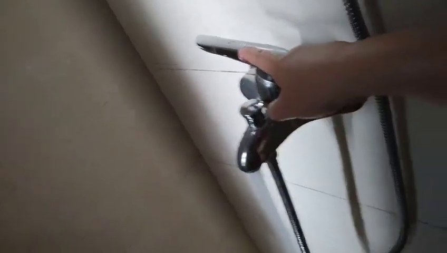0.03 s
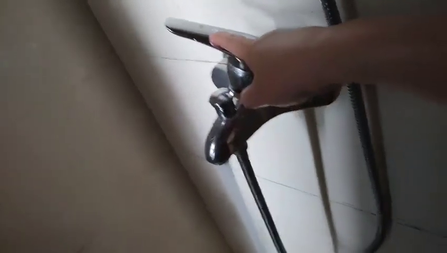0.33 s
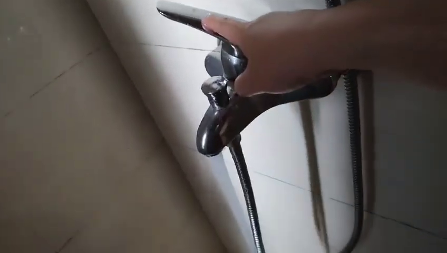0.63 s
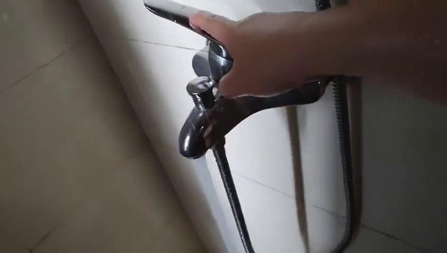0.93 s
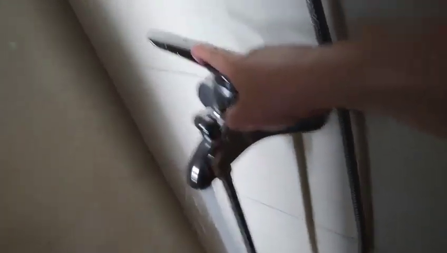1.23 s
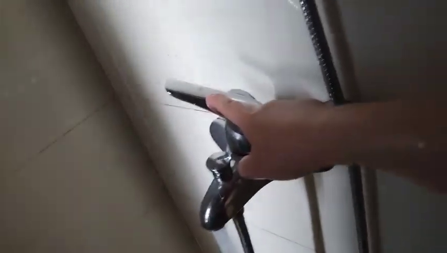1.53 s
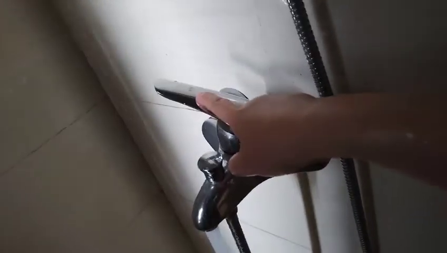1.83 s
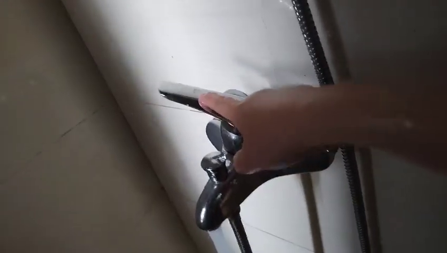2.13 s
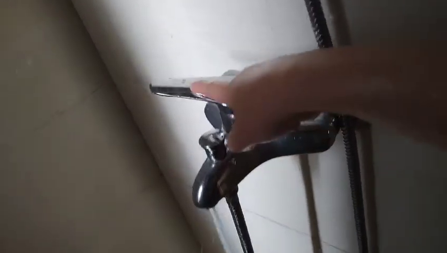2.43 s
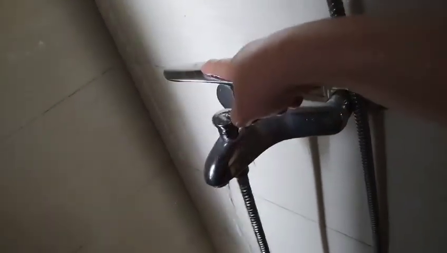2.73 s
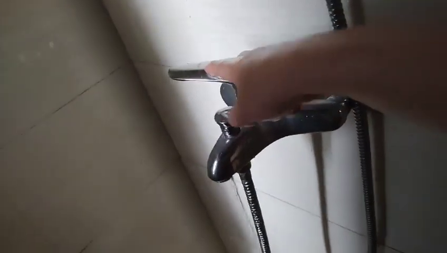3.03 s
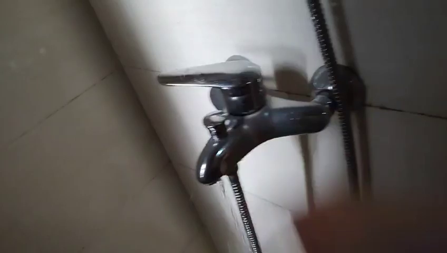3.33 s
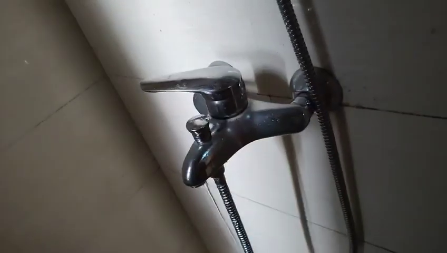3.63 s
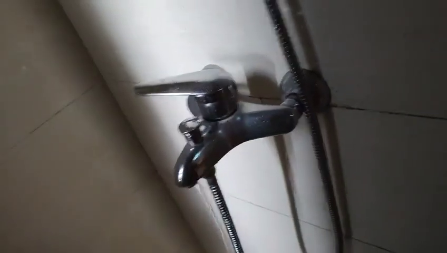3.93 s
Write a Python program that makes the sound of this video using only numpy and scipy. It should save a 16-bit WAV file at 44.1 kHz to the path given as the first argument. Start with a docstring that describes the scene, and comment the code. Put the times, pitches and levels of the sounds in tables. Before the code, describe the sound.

A stream of tap water splatters unevenly on wet tiles with a fine hiss and short bathroom echo. After a dull bump from the lever, it cuts off, leaving faint drips and two late splashes. One microphone hears it.

```python
"""Water from a bath tap falls on the floor of a small tiled bathroom: lumpy patter, hard slaps, pinging
bubbles and a fine spray. The tiles ring briefly, over a faint room noise. At 2.3 s the lever is pushed
shut with a dull bump, and at 2.9 s the stream stops. Tiny drips follow, and among them two late
splashes, near 3.4 s and 3.7 s. One microphone hears it all."""
import sys
import numpy as np
from scipy import signal
from scipy.fft import rfft, irfft
from scipy.io import wavfile

SR = 44100
rng = np.random.default_rng(int(sys.argv[2]) if len(sys.argv) > 2 else 0)


def int16_out(signal):
    """Quantize to a 16-bit WAV file."""
    q = np.round(np.clip(np.atleast_2d(signal).T, -1, 1) * 32767)
    wavfile.write(sys.argv[1], SR, q.astype(np.int16))


N = 176400
SHUT_S, PATTER_FALL_DB_PER_S = 2.916, 902


def amp(db):
    """Amplitude grows tenfold for every 20 dB."""
    return 10 ** (np.asarray(db) / 20)


def unit_rms(x):
    """Normalisation to a mean power of one."""
    return x / np.sqrt(np.mean(x ** 2) + 1e-20)


def unit_energy(x):
    """Normalisation to a total energy of one."""
    return x / (np.linalg.norm(x) + 1e-12)


def at_hz(points, hz):
    """Interpolation on a logarithmic frequency axis."""
    known_hz, values = np.transpose(points)
    return np.interp(np.log(hz + 1), np.log(known_hz + 1), values)


def add(mix, start_s, sound):
    """Superposition: a sound adds to the mix from its start time."""
    part = mix[max(round(start_s * SR), 0):][:len(sound)]
    part += sound[:len(part)]


def stream_level(curve, fall_db_per_s=PATTER_FALL_DB_PER_S):
    """Amplitude envelope: the stream follows a curve, then decays exponentially once the tap is shut."""
    t = np.arange(N) / SR
    db = np.interp(t + 0.01, *np.transpose(curve))  # 10 ms ahead, as the room takes that long to fill
    return amp(db - fall_db_per_s * np.maximum(t - SHUT_S, 0))


def drops(per_s, spread_db):
    """Shot noise: independent impacts at random times, many small and a few large."""
    hits = rng.random(N) < per_s / SR
    size = np.minimum(rng.exponential(1, N), 4)
    sign = rng.choice([-1, 1], N)
    return unit_rms(hits * sign * amp(spread_db * size))


def bursts(rows, flatten_s=0.00035, droplets_per_s=2500, size=4096):
    """Break-up on impact: each lump flattens and throws droplets whose strength decays exponentially."""
    out, t = np.zeros(N), np.arange(size) / SR
    for start_s, db, scatter_s in rows:
        droplets = rng.standard_normal(size) * (rng.random(size) < droplets_per_s / SR)
        envelope = np.minimum(t / flatten_s, 1) ** 2 * np.exp(-t / scatter_s)
        add(out, start_s, amp(db) * unit_energy(droplets * envelope))
    return out


# Decay of the tiled room. Each row: frequency in Hz, time to fall 60 dB in seconds.
REVERB_TIMES = [(200, 0.66), (1500, 0.24), (4000, 0.23), (7000, 0.17), (11000, 0.31)]
def bathroom(x, size=22050, echo_count=12, echo_span_s=0.018, echo_db=2.5, tail_db=2):
    """Reverberation: direct sound, early reflections off the near tiles and a short diffuse tail."""
    reflections = rng.standard_normal(size) * (rng.random(size) < 1 / 12)
    hz, t, spectrum = signal.stft(reflections, SR, nperseg=256)
    decay = amp(-60 * t / at_hz(REVERB_TIMES, hz)[:, None])
    build_up = 1 - np.exp(-t / 0.006)
    tail = signal.istft(spectrum * decay * build_up, SR)[1][:size]
    echoes = np.zeros(size)
    places = (np.arange(echo_count) + rng.random(echo_count)) / echo_count
    for place, sign in zip(places, rng.choice([-1, 1], echo_count)):
        add(echoes, 0.001005 + place * echo_span_s, np.array([sign * np.exp(-place / 2)]))
    response = amp(tail_db) * unit_energy(tail) + amp(echo_db) * unit_energy(echoes)
    response[0] += 1  # direct sound
    return signal.oaconvolve(x, unit_energy(response))[:N]


def landing(clicks, colour, spots, size=2048):
    """Convolution: each impact takes the echoes of its spot and a minimum-phase ring of given colour."""
    spot = rng.integers(0, spots, N)
    echoed = sum(bathroom(clicks * (spot == k)) for k in range(spots))
    log_gain = np.log(amp(at_hz(colour, abs(np.fft.fftfreq(size, 1 / SR)))))
    ring = np.fft.ifft(np.exp(np.conj(signal.hilbert(log_gain)))).real[:size // 2]
    return signal.oaconvolve(echoed, unit_energy(ring))[:N]


# Spectrum of the room's air. Each row: frequency in Hz, relative level in dB.
AIR_SPECTRUM = [(20, -54), (45, -38), (80, -27), (115, -10), (180, -8.5), (340, -1), (600, -7.5),
                (750, -3.5), (1050, -7), (1340, -11), (2600, -25), (3400, -42), (6000, -65)]
def room_noise():
    """Stationary filtered noise: the faint murmur of air in the room."""
    gain = amp(at_hz(AIR_SPECTRUM, np.fft.rfftfreq(N, 1 / SR)))
    return amp(-69) * unit_rms(irfft(rfft(rng.standard_normal(N)) * gain, N))


# Force of the falling stream. Each row: time in seconds, relative level in dB.
STREAM_CURVE = [(0.0, -32), (0.14, -33), (0.24, -34), (0.27, -34), (0.35, -33.5), (0.4, -32.5),
                (0.5, -35.5), (0.585, -39), (0.6, -28.5), (0.72, -36), (0.76, -32), (0.86, -32),
                (0.92, -35.5), (1.0, -36.5), (1.03, -32), (1.14, -33.5), (1.17, -37), (1.19, -38),
                (1.29, -30), (1.33, -37), (1.41, -39.5), (1.52, -32), (1.57, -36.5), (1.6, -30.5),
                (1.7, -33.5), (1.74, -32.5), (1.88, -36.5), (1.92, -33), (2.02, -35.5), (2.12, -34.5),
                (2.155, -33.5), (2.19, -32.5), (2.26, -32), (2.3, -35), (2.42, -32.5), (2.67, -33.5),
                (2.75, -30), (2.77, -38.5), (2.81, -28), (2.87, -39), (2.91, -35)]
# Lumps slapping down. Each row: start in seconds, relative level in dB, bubble pitch in Hz.
HARD_SLAPS = [(.001, -0.5, 3670), (0.012, -7, 4300), (.031, -6, 4440), (.042, -7.5, 3960),
              (.109, -2.5, 4070), (0.169, -5.5, 3930), (.252, -4, 3900), (.312, -14, 4160),
              (0.37, -8, 4100), (.547, -8.5, 3410), (0.596, -13, 3400), (.645, -7, 3960), (0.671, -7, 4500),
              (.811, -4.5, 3530), (.844, -2, 3870), (0.857, -5.5, 4560), (0.972, -5, 3960),
              (1.013, -8.5, 3880), (1.101, -16, 3430), (1.187, -4, 3680), (1.228, -4.5, 3830),
              (1.253, -9, 3380), (1.351, -6, 3770), (1.368, -8, 4400), (1.45, -5.5, 3570),
              (1.504, -5, 4280), (1.582, -15, 4050), (1.61, -6, 3880), (1.638, -11, 4300),
              (1.667, -1, 4390), (1.7, -3.5, 3200), (1.827, -4.5, 4430), (1.932, -7.5, 3950),
              (1.997, -7.5, 3140), (2.051, -8, 3080), (2.1, -5, 4410), (2.178, -4.5, 4440),
              (2.214, -3.5, 3040), (2.358, -13, 3600), (2.415, -7, 3320), (2.52, -2.5, 4510),
              (2.647, -15, 3410), (2.672, -7, 4500), (2.736, -10, 3960), (2.795, -8, 4410),
              (2.885, -4.5, 3350), (2.9, -20, 3720)]
# Spectrum of an impact. Each row: frequency in Hz, relative level in dB.
PATTER_SPECTRUM = [(60, -55), (105, -37.5), (140, -26.5), (200, -29.5), (400, -29), (800, -22), (1400, -20),
                   (2100, -17.5), (2550, -10.5), (3100, -1), (3550, 0.5), (3900, 1), (4500, 1.5),
                   (4900, -5), (5400, -8.5), (7000, -17), (12000, -38)]
def patter():
    """Impact noise: the stream breaks into drops and lumps that smack the wet floor."""
    rain = amp(-4) * stream_level(STREAM_CURVE) * drops(per_s=900, spread_db=3)
    slaps = bursts([(s, db - 3, 0.0021) for s, db, _ in HARD_SLAPS])
    return landing(rain + slaps, PATTER_SPECTRUM, spots=4)


# Strength of the deeper slapping. Each row: time in seconds, relative level in dB.
HOLLOW_CURVE = [(0.0, -44), (0.24, -49.5), (0.5, -49.5), (0.62, -47), (1.1, -47), (1.18, -55),
                (1.29, -44.5), (1.42, -51), (1.56, -52), (1.7, -46), (1.76, -52), (1.95, -47), (2.14, -48),
                (2.24, -41.5), (2.3, -45), (2.6, -48.5), (2.93, -51)]
# Single hollow slaps. Each row: start in seconds, relative level in dB, bubble pitch in Hz.
HOLLOW_SLAPS = [(0.254, -10.5, 2310), (1.604, -15.5, 2100), (1.668, -10, 2160), (2.167, -8.5, 2110),
                (2.214, -17, 2230), (2.527, -14, 2200)]
# Spectrum of a large lump. Each row: frequency in Hz, relative level in dB.
HOLLOW_SPECTRUM = [(200, -41.5), (700, -17), (1400, -11), (1800, -2.5), (2150, 5.5), (2600, 1), (3200, 6),
                   (4200, -35.5), (8000, -30)]
def hollow_patter():
    """Pitch falls with size: fewer, larger lumps land with a deeper note."""
    rain = amp(2) * stream_level(HOLLOW_CURVE) * drops(per_s=260, spread_db=4)
    slaps = bursts([(s, db - 4.5, 0.0055) for s, db, _ in HOLLOW_SLAPS])
    return landing(rain + slaps, HOLLOW_SPECTRUM, spots=3)


def ping(hz, t60_s, rise_per_s=1.4):
    """Damped oscillation: a trapped bubble rings, its pitch climbing as it nears the surface."""
    t = np.arange(3000) / SR
    tone = np.sin(2 * np.pi * hz * t * (1 + rise_per_s * t / 2))
    attack = 1 - np.exp(-hz * t)
    return unit_energy(tone * attack * amp(-60 * t / t60_s))


def bubbles(low_hz=2950, high_hz=4850, sizes=30):
    """Bubble resonance: air trapped by the drops pings at a pitch set by its size."""
    out = np.zeros(N)
    clicks = amp(-6.5) * stream_level(STREAM_CURVE) * drops(per_s=150, spread_db=1.5)
    size = rng.integers(0, sizes, N)
    for k, hz in enumerate(np.geomspace(low_hz, high_hz, sizes)):
        ring = ping(hz, t60_s=0.046)
        for at in np.flatnonzero(clicks * (size == k)):
            add(out, at / SR, clicks[at] * ring)
    return bathroom(out)


# Resonances where the stream lands. Each row: frequency in Hz, bandwidth in Hz, added gain as a ratio.
LANDING_MODES = [(2170, 24, 0.15), (2336, 22, 0.51), (2767, 41, 0.78), (3170, 46, 0.48), (3410, 19, 0.92),
                 (3816, 35, 0.69), (3960, 25, 0.91), (4430, 25, 0.94), (4600, 34, 0.21), (4970, 24, 0.26)]
def ringing(x):
    """Resonance: the place where the water lands favours a few narrow notes."""
    return x + sum(boost * signal.lfilter(*signal.iirpeak(hz, hz / width, fs=SR), x)
                   for hz, width, boost in LANDING_MODES)


def plinks(slaps, gain_db):
    """Air entrainment: each big lump traps a bubble that rings at its own pitch, from its own spot."""
    out = np.zeros(N)
    for start_s, db, hz in slaps:
        plink = bathroom(ping(hz, t60_s=0.026), size=8000)
        add(out, start_s, amp(db + gain_db) * unit_energy(plink))
    return out


# Strength of the spray. Each row: time in seconds, relative level in dB.
SPRAY_CURVE = [(0.0, -35), (0.06, -40.5), (0.79, -40), (0.93, -43.5), (1.23, -37.5), (1.39, -41.5),
               (1.49, -37), (1.58, -42.5), (1.6, -37), (1.61, -41), (1.91, -40.5), (1.94, -35.5),
               (1.98, -42), (2.32, -42), (2.34, -38.5), (2.79, -40), (2.8, -36.5), (2.93, -49)]
# Spectrum of a fine droplet. Each row: frequency in Hz, relative level in dB.
SPRAY_SPECTRUM = [(1000, -30), (3500, -6.5), (5200, -0.5), (6000, 0.5), (7000, 3.5), (7600, 2.5), (8600, 5),
                  (9700, -4), (11000, -3), (12000, -6)]
def spray():
    """Dense shot noise: thousands of fine droplets merge into a hiss."""
    level = amp(1.4) * stream_level(SPRAY_CURVE, fall_db_per_s=598)
    return landing(level * drops(per_s=2800, spread_db=5), SPRAY_SPECTRUM, spots=6)


# Jolts of the lever. Each row: start in seconds, relative level in dB, tilt in dB per octave.
LEVER_JOLTS = [(2.308, 0, 17), (2.327, -1, 12), (2.343, 0.5, -6), (2.378, 1, 0), (2.445, -7, 4),
               (2.486, -5.5, -1)]
# Modes of the bump. Each row: frequency in Hz, base level in dB, time to fall 60 dB in seconds.
LEVER_MODES = [(284.4, -54, 0.38), (215.4, -54, 0.24), (396, -60.5, 0.13), (171, -64, 0.22)]
def lever_bump(rise_s=0.0017):
    """Modal vibration: as the lever moves, a few jolts ring the same low modes in a dull shudder."""
    out, t = np.zeros(N), np.arange(SR // 2) / SR
    pivot_hz = LEVER_MODES[0][0]
    for start_s, jolt_db, tilt_db in LEVER_JOLTS:
        for hz, db, t60_s in LEVER_MODES:
            level = amp(db + jolt_db + tilt_db * np.log2(hz / pivot_hz))
            envelope = (1 - np.exp(-t / rise_s)) * amp(-60 * t / t60_s)
            add(out, start_s, level * envelope * np.sin(2 * np.pi * (hz * t + rng.random())))
    return out


# Tiny drips. Each row: start in seconds, relative level in dB.
LATE_DRIPS = [(3.02, -33.5), (3.149, -36.5), (3.29, -41), (3.50, -38), (3.535, -41), (3.575, -34.5),
              (3.628, -35), (3.918, -39)]
# Spectrum of a drip. Each row: frequency in Hz, relative level in dB.
DRIP_SPECTRUM = [(1000, -25), (2600, -10), (3300, -4), (4400, 1.5), (5400, -10.5), (6800, -5.5),
                 (7700, -7.5), (8700, -2.5), (9800, -10.5), (12000, -10.5)]
def drips():
    """Masking: the stream hides a faint steady trickle; once it stops, tiny drips tick over that bed."""
    trickle = amp(-73.5) * drops(per_s=200, spread_db=3)
    ticks = bursts([(s, db, 0.0055) for s, db in LATE_DRIPS])
    return landing(trickle + ticks, DRIP_SPECTRUM, spots=2)


# Late lumps. Each row: start in seconds, relative level in dB, scatter time in seconds, pitch ratio.
LATE_LUMPS = [(3.358, -11, 0.0018, 0.9), (3.369, -10.5, 0.003, 0.93), (3.39, -9.5, 0.018, 0.98),
              (3.728, -12.5, 0.0019, 1.0), (3.735, -7, 0.0096, 1.0), (3.669, -33, 0.032, 0.96),
              (3.87, -39, 0.0045, 0.92)]
# Spectrum of a splash at pitch ratio one. Each row: frequency in Hz, relative level in dB.
SPLASH_SPECTRUM = [(100, -49), (500, -35), (1500, -36), (2100, -25.5), (2650, -20.5), (3250, -7),
                   (3850, -0.5), (4500, 3.5), (5250, -15), (6200, -16.5), (7200, -20), (8700, -22.5),
                   (9900, -27.5), (12000, -36)]
def splashes():
    """Impact transients: the last lumps from the spout land with a snap of fine spray and spatter."""
    snaps = bursts([(s, db - 20, 0.0015) for s, db, _, _ in LATE_LUMPS])
    out = landing(snaps, SPRAY_SPECTRUM, spots=2)
    for start_s, db, scatter_s, pitch in LATE_LUMPS:
        spatter = bursts([(start_s, 0, scatter_s)], flatten_s=0.0019)
        colour = [(hz * pitch, level) for hz, level in SPLASH_SPECTRUM]
        out += amp(db) * unit_energy(landing(spatter, colour, spots=3))
    return out


def scene():
    """Superposition: water, bump and room noise sum at one microphone, which feeds both channels."""
    stream = ringing(patter() + hollow_patter() + bubbles())
    stream += plinks(HARD_SLAPS, gain_db=-5.5) + plinks(HOLLOW_SLAPS, gain_db=-2.5) + spray()
    mono = stream + splashes() + drips() + lever_bump() + room_noise()
    return np.array([mono, mono])


def record(dry, low_cut_hz=68, high_cut_hz=12050):
    """Band limiting: the microphone loses the deep bass, then a steep filter removes the top treble."""
    highpass = signal.butter(3, low_cut_hz, "highpass", fs=SR, output="sos")
    lowpass = signal.firwin(511, high_cut_hz, window=("kaiser", 9), fs=SR)
    return signal.oaconvolve(signal.sosfilt(highpass, dry), lowpass[None], "same")


dry = scene()
out = record(dry)
int16_out(out)
```